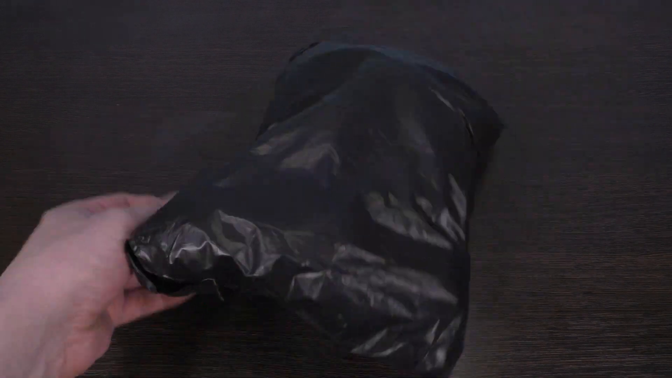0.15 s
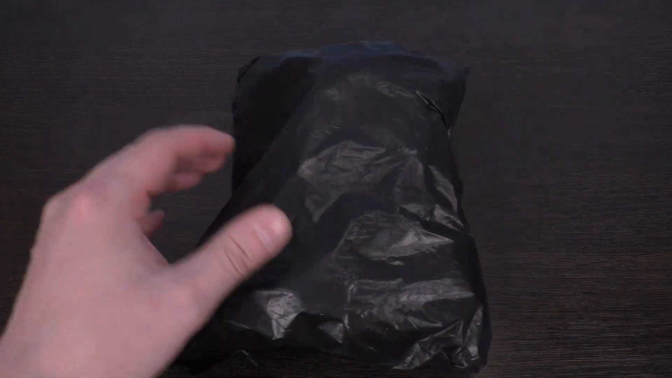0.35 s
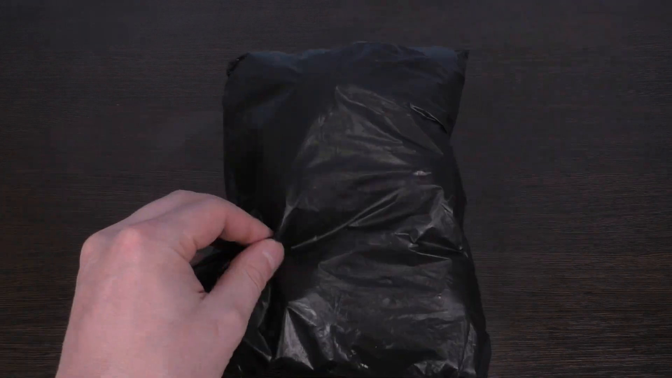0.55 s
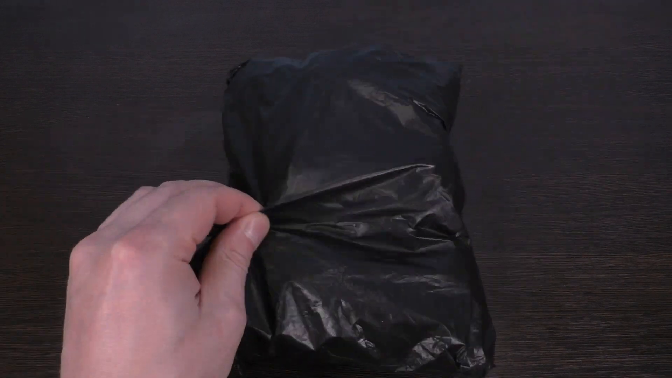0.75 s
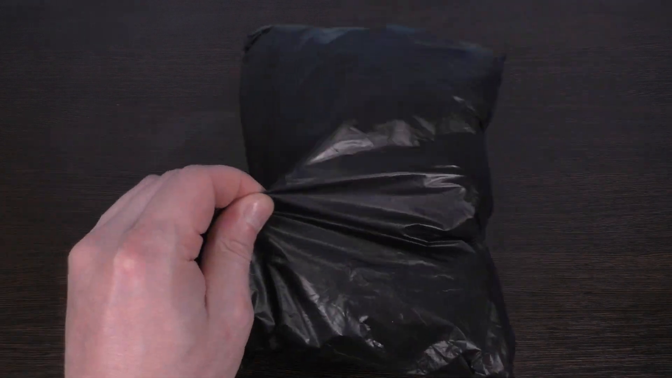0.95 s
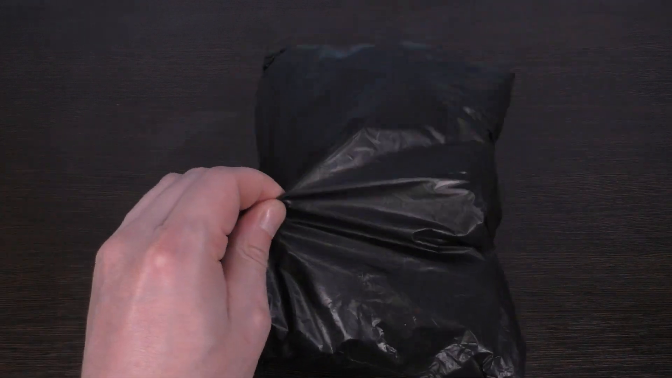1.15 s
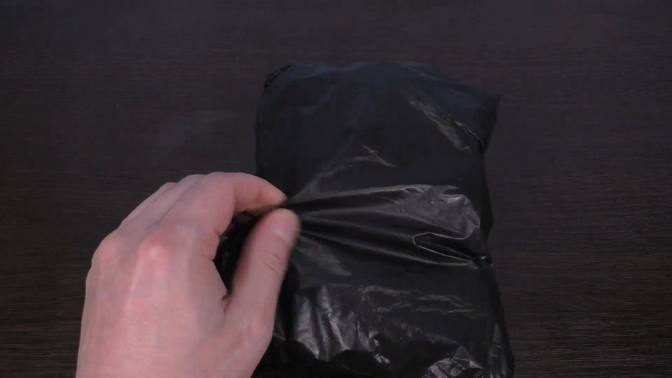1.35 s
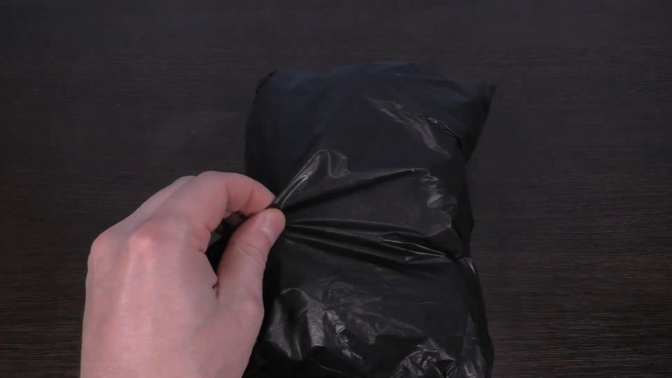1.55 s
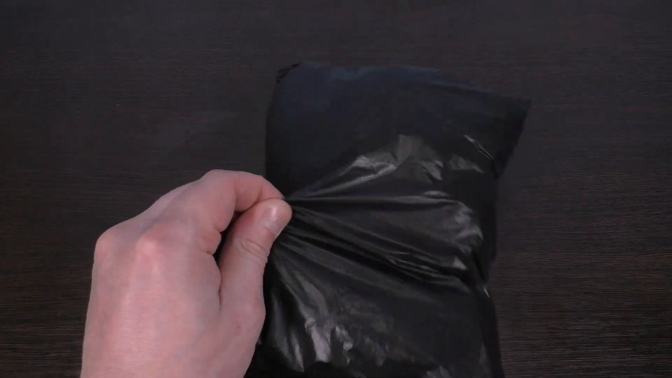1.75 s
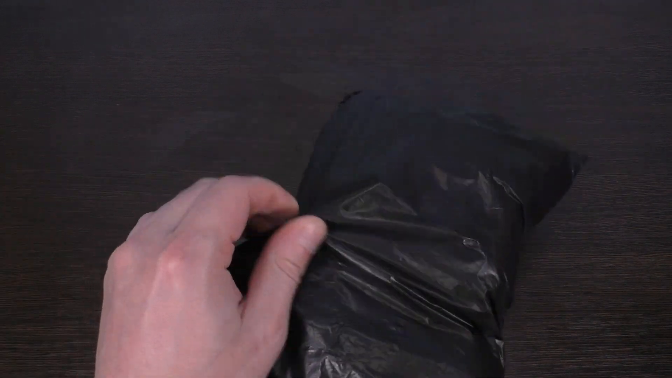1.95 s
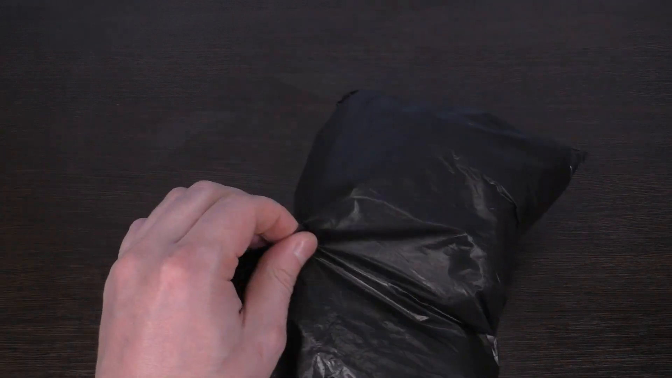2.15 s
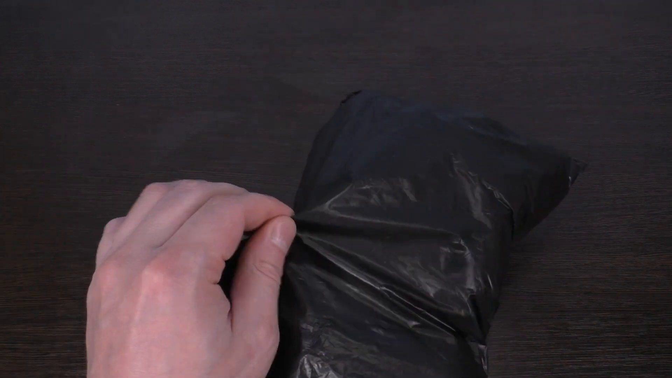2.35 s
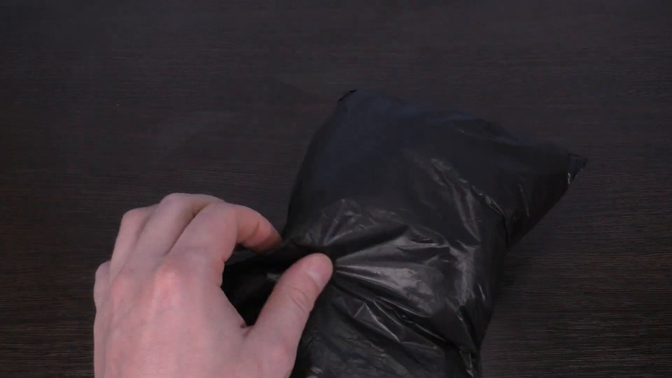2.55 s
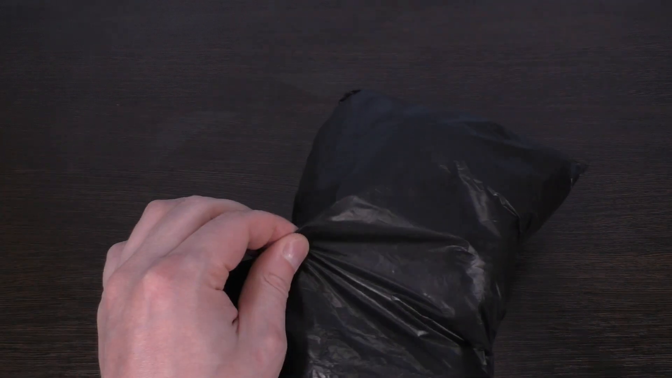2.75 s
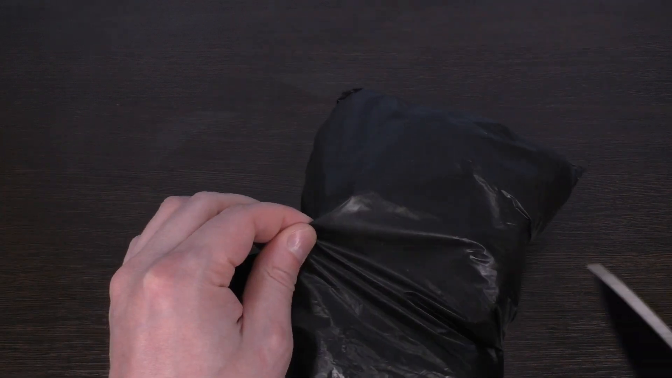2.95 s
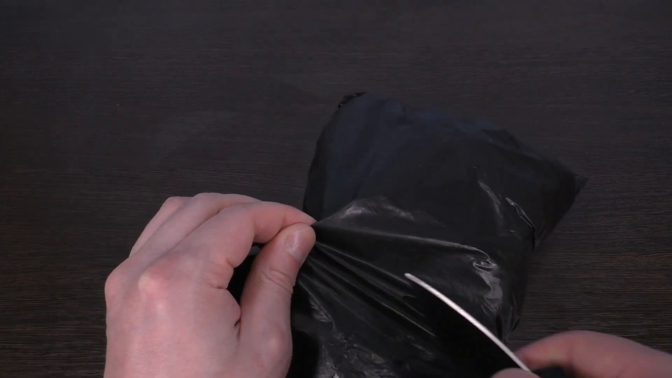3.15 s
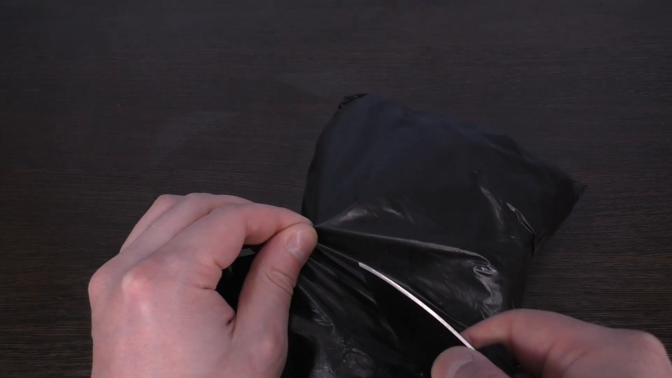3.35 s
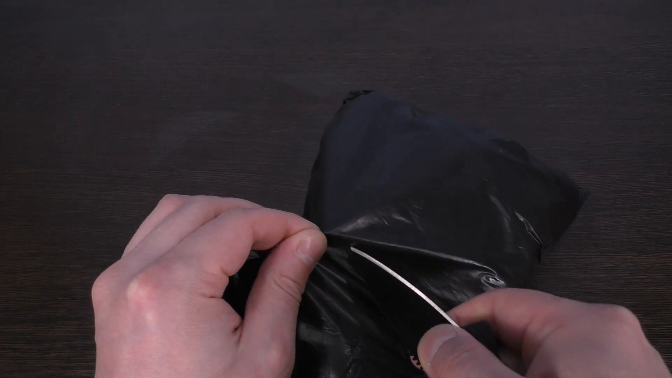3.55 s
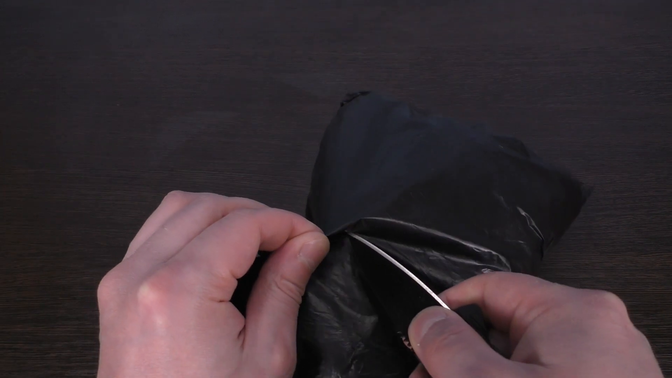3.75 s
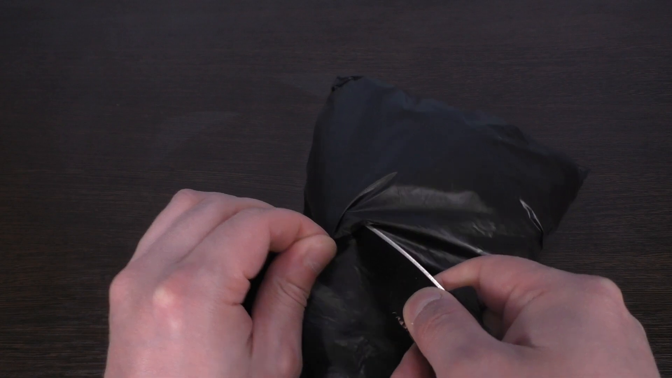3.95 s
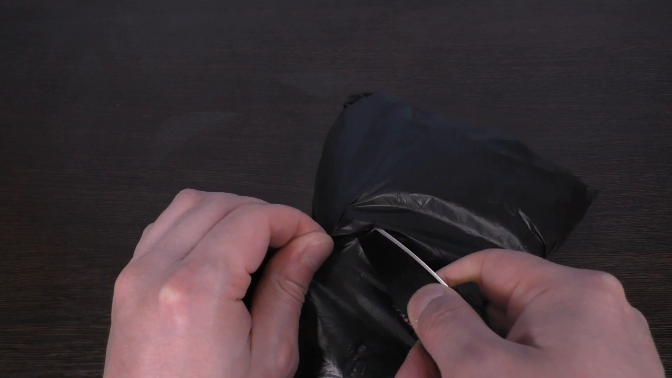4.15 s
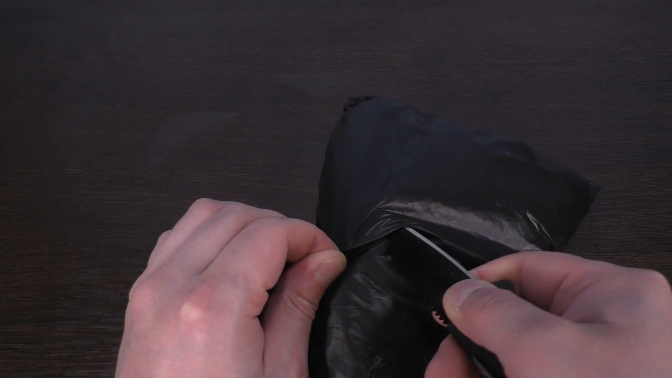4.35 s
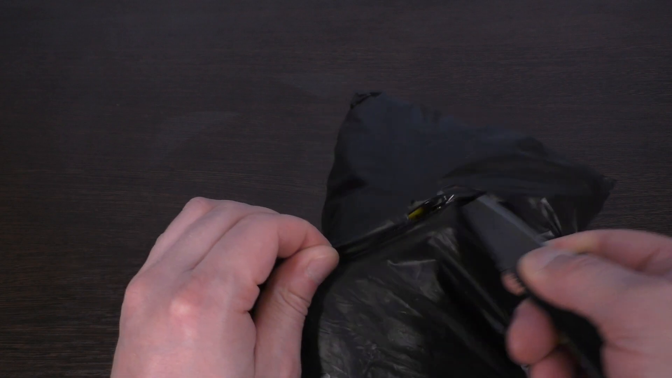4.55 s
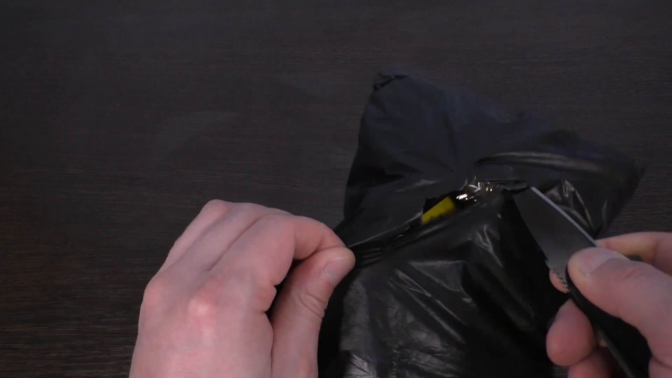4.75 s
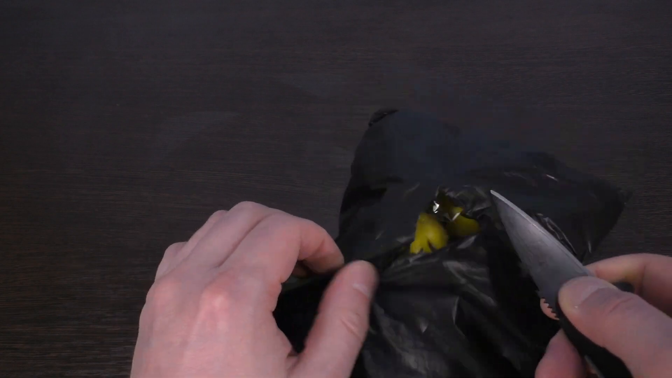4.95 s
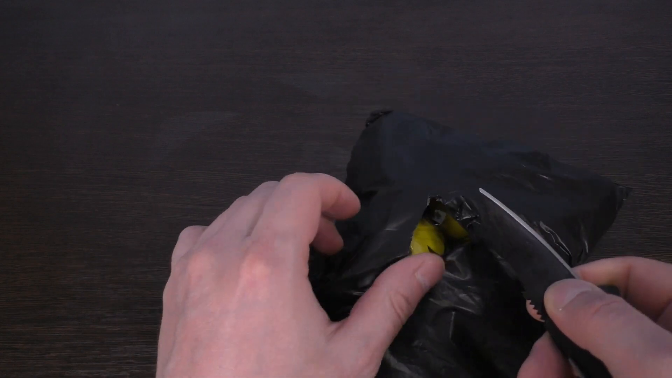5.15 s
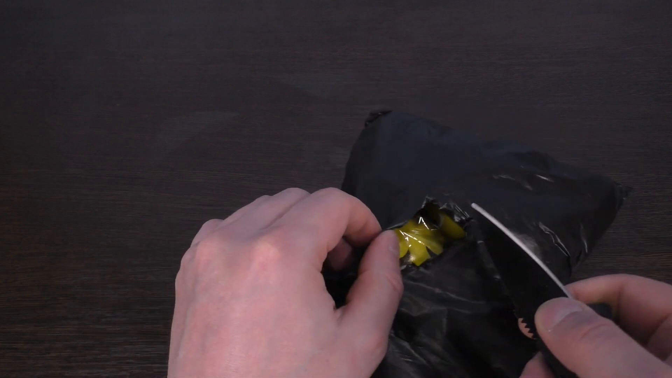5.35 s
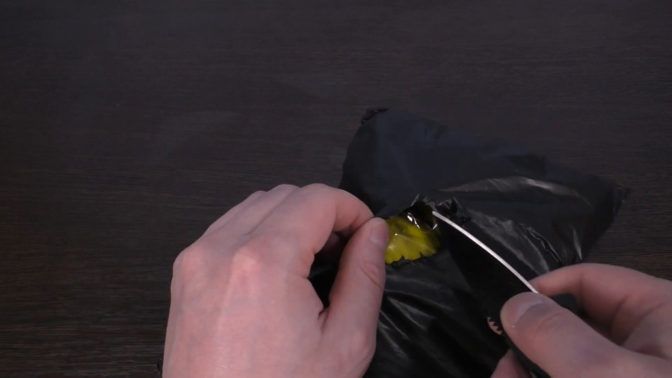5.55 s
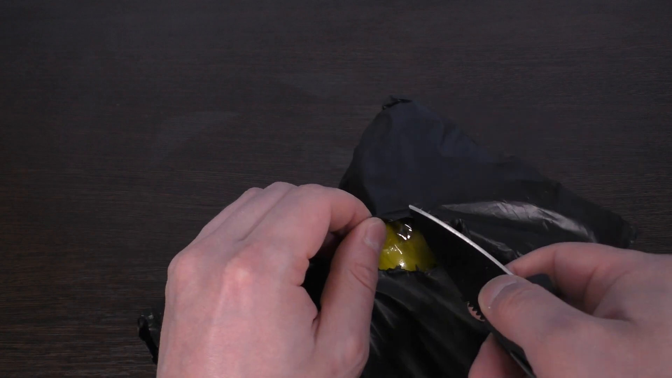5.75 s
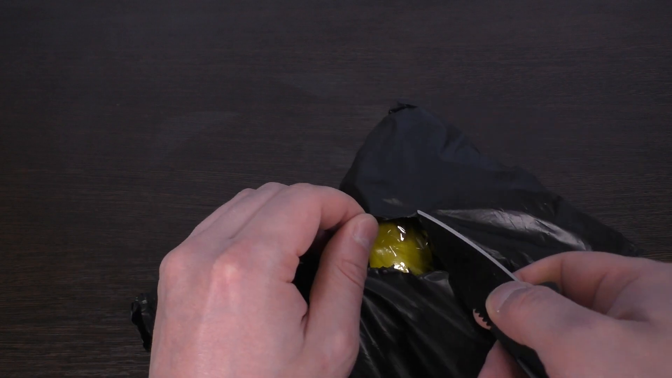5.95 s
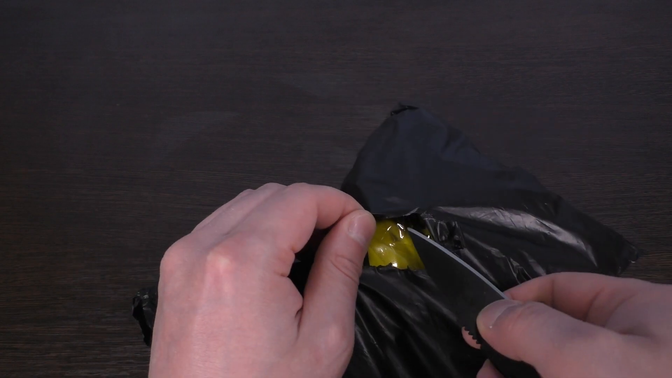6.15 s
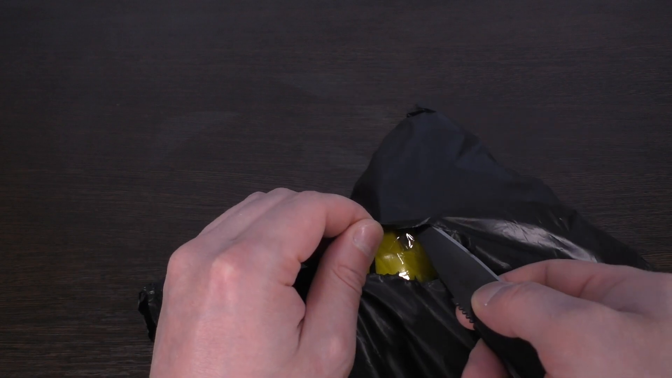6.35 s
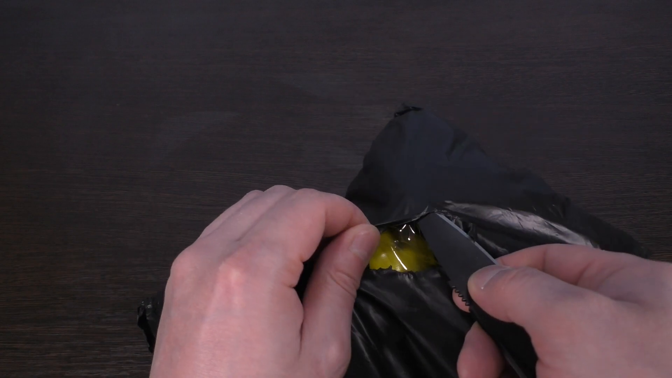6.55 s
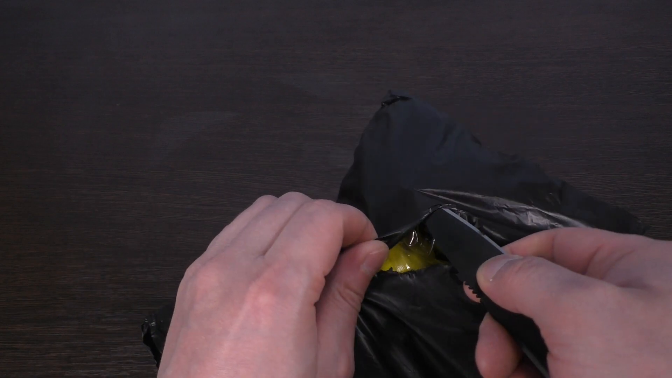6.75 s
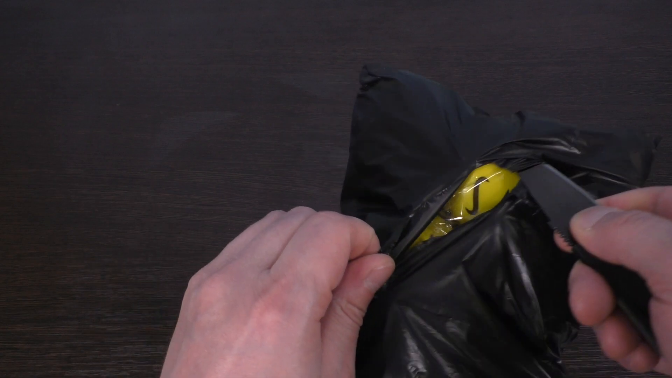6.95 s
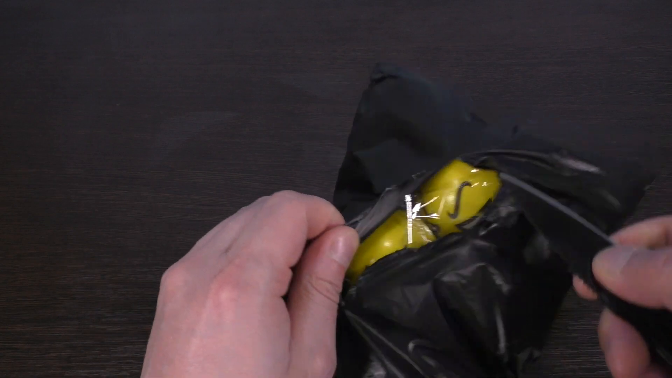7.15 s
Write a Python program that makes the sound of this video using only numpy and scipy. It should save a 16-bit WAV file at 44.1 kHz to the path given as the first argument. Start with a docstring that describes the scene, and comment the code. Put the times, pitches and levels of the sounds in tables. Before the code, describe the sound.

A soft parcel in thin plastic film lands on a wooden table with a rustle and dull thump. Fingers pinch and pull it in uneven bursts of bright crinkling. After a near-silent lull, a blade stretches and slits the film with loud, taut snaps, then lighter crackles, another hush and a final tearing rustle. Close microphone, small quiet room.

```python
"""A short rustle and a soft thump: a thin plastic mailer bag is dropped on a wooden table, close up.
It is then pinched taut and slit with a knife, heard as crinkle: random tiny pops, denser with effort.
Single creases snap, loud or faint, each a crack plus a briefly swinging panel; quick runs of pops join in.
The skin adds a low flutter and the parcel soft thumps, made of short decaying notes and pushes.
The table answers with an echo and a hum, the small room with a diffuse tail over a faint noise bed."""
import sys
import numpy as np
from scipy import signal
from scipy.fft import rfft, irfft, next_fast_len
from scipy.io import wavfile
from scipy.ndimage import uniform_filter1d, map_coordinates

SR = 44100
rng = np.random.default_rng(int(sys.argv[2]) if len(sys.argv) > 2 else 0)


def wrap_up_sound(samples):
    """Save the sound to the file named by the first command line argument, as 16-bit audio."""
    columns = np.atleast_2d(samples).T
    # keep every value between -1 and 1, then stretch to whole-number steps
    tamed = np.clip(columns, -1, 1)
    steps = np.round(tamed * 32767).astype(np.int16)
    wavfile.write(sys.argv[1], SR, steps)


N = 321930

# All levels are relative, ahead of the mix gains; coloured() reads spectra for their shape only.
# single creases that stand out, loud or faint, flip over or give way to the blade:
# t/s, panel level/dB, panel f/Hz, crack level/dB
CREASE_SNAPS = [(0.2648, -22, 3210.0, -31), (0.484, -22.5, 3350.0, -22.0), (0.5007, -26, 3440.0, -26),
                (0.551, -19.5, 2680.0, -16), (0.5814, -22.0, 2480.0, -22), (0.6091, -21.5, 2450.0, -20.0),
                (0.7784, -22.5, 2760.0, -18), (0.8532, -20.0, 2370, -18.5), (0.8822, -19.5, 3340.0, -15.5),
                (0.9583, -20.5, 2542, -27), (1.1285, -27, 2700.0, -26.5), (1.2016, -25.5, 2970.0, -30),
                (1.2718, -21, 2160.0, -27), (1.6646, -24.5, 3990.0, -25.0), (1.7336, -25, 2810.0, -21.0),
                (1.88, -27, 2510.0, -28), (1.9109, -33.0, 2590.0, -25.5), (1.9837, -19, 2800.0, -23.5),
                (2.0315, -23, 2450.0, -23.5), (2.0912, -26.5, 2630.0, -27.5), (2.4496, -27, 3780.0, -30.5),
                (2.5693, -21.5, 3120.0, -26.0), (2.6169, -22, 2668, -21), (2.6303, -27, 3280.0, -32),
                (2.708, -26, 1900.0, -26), (2.8899, -28, 3030, -21.5), (3.0141, -26.5, 3180, -22.5),
                (3.0573, -32, 2970.0, -32), (3.0969, -30.5, 3370.0, -31.5), (3.1199, -27, 3490.0, -36.0),
                (3.1673, -34.0, 3090.0, -37), (3.2241, -30.5, 3370.0, -36.0), (3.2929, -35, 2338, -46),
                (3.3464, -30.5, 1970.0, -29.0), (3.3812, -34.5, 1630.0, -39), (3.4349, -27.5, 3000.0, -32),
                (3.4846, -42.0, 2460.0, -35.0), (3.4933, -29, 3000, -41), (3.6209, -39.0, 2760.0, -45),
                (3.631, -27, 2010.0, -54), (3.6416, -30, 3530.0, -28.0), (3.6849, -18.5, 2570.0, -19),
                (3.7332, -22.0, 2646, -23), (3.8268, -20.5, 2700, -26), (3.8646, -25, 1980.0, -26.0),
                (3.8927, -25, 2990.0, -21), (3.9153, -23.5, 2410.0, -27.5), (3.9952, -13, 2230, -12.0),
                (4.0331, -16, 2750, -24.0), (4.0613, -24, 3110.0, -12.5), (4.1983, -21.5, 2070, -24.5),
                (4.288, -26.5, 1610.0, -38), (4.3095, -34, 2020.0, -33), (4.3329, -13.5, 2420, -19),
                (4.4248, -33, 2290.0, -20), (4.5438, -15.5, 2160, -13.5), (4.5988, -12.0, 2130.0, -17),
                (4.8106, -34, 3370.0, -28), (4.865, -25, 2550.0, -35), (4.9981, -22, 2620.0, -22),
                (5.1651, -25.5, 2950, -33.5), (5.2339, -29.5, 2720, -34), (5.3486, -29, 3710.0, -19),
                (5.4024, -22.5, 2200.0, -24.5), (5.4606, -32, 2750.0, -24), (5.5109, -33, 2530.0, -30),
                (5.5863, -26.0, 3220.0, -21), (5.6507, -29.5, 1790.0, -26), (5.6941, -39, 2740.0, -29.5),
                (5.7648, -31, 2470.0, -29), (5.8282, -26.5, 2200, -33), (5.8656, -34, 3060.0, -31.5),
                (5.9095, -31.5, 2424, -46), (5.9588, -37, 2010.0, -37.5), (6.1874, -36, 2320.0, -42.0),
                (6.2091, -37, 3090.0, -49), (6.3071, -37.0, 2760.0, -45.0), (6.5638, -30, 2700.0, -36),
                (6.6227, -27.5, 3050.0, -31.5), (6.7149, -25.5, 2830, -29.5), (6.8225, -31.5, 1600.0, -29),
                (7.0426, -24, 3770.0, -26)]
# the parcel lands, is nudged and tugged: t/s, level/dB, f/Hz
PARCEL_THUMPS = [(0.094, -20.5, 183), (0.35, -31, 125), (0.477, -34, 210), (1.521, -30, 170.1),
                 (1.788, -31, 160.9), (1.97, -26, 165), (2.03, -31, 170), (2.14, -29.5, 166.9),
                 (2.616, -31, 245), (2.712, -30.5, 283), (2.891, -24, 286), (3.013, -35, 254),
                 (3.685, -26.5, 287), (3.996, -18, 290), (4.059, -26, 205), (4.195, -25, 250),
                 (4.377, -29, 203), (4.556, -31, 165), (6.182, -41, 238), (6.713, -39, 206),
                 (6.943, -35, 270), (7.024, -22, 233)]
# spectrum of the film's panels: f/Hz, level/dB
PANEL_COLOUR = [(400, -41.5), (650, -3), (850, -12), (1050, -2.5), (1280, -5.5), (1450, -3.5), (1900, -2),
                (3100, 0), (4200, -3.5), (5500, -9), (7000, -13), (10000, -43.5)]
# spectrum of its sharp creases: f/Hz, level/dB
CREASE_COLOUR = [(3000, -31), (5000, -5), (7000, -5.5), (8700, 0.5), (10600, 1), (13600, -3),
                 (16000, -13.5)]
# spectrum of the whole skin: f/Hz, level/dB
SKIN_COLOUR = [(30, -43), (60, -17.5), (100, -12.5), (125, -2), (150, -10), (185, -2), (300, -2),
               (450, -5.5), (600, -15), (900, -17.5)]
# spectrum of the quiet room: f/Hz, level/dB
QUIET_COLOUR = [(20, -29), (36, -12), (49, 11), (62, -6), (125, 3.5), (300, -3.5), (700, -7.5), (3000, -12),
                (16000, -25)]
# decay of the room tail: f/Hz, t60/s
ROOM_DECAY = [(120, 0.53), (400, 0.41), (2500, 0.42), (8000, 0.32), (16000, 0.49)]
# how tightly the blade stretches the film: t/s, tension/0-1
FILM_TENSION = [(3.5, 0.4), (3.98, 0.8), (4.55, 1), (4.75, 0.5), (5.1, 0.36), (6.0, 0.4), (7.0, 0.5)]
# a stretched panel sings higher and loses its slack low notes: f/Hz, level/dB
TAUT_COLOUR = [(400, -5.5), (650, -3.5), (850, -9), (1080, -2), (1450, 4.5), (1750, -2), (2200, -1.5),
               (4000, 0.5)]
# colour of the left-right difference: f/Hz, level/dB
WIDTH_COLOUR = [(100, 3), (300, 1.5), (700, -0.5), (1200, -1.5), (4800, 2), (6400, -4.5), (7700, -26),
                (9500, -0.5), (12500, 1.5), (16000, 7)]
# low resonances of table and room: f/Hz, t60/s, level when the parcel lands/dB
LOW_RESONANCES = [(126, 0.65, -37), (184, 0.45, -26)]
# one crease sets off its neighbours in a quick run: t/s, start level/dB, t60/s
CREASE_RUNS = [(0.481, -27, .08), (1.2701, -30, 0.06), (2.5975, -26, .045), (3.164, -38, 0.044),
               (3.346, -32.5, 0.04), (3.434, -33.5, 0.041), (3.483, -44, 0.03), (3.492, -36, 0.035),
               (3.998, -19, 0.041), (4.376, -20.5, 0.087), (4.543, -19, 0.074), (5.163, -47, 0.023),
               (5.233, -36, 0.021), (5.4522, -29, .03), (6.179, -46, 0.061), (6.8901, -29, 0.045)]
# what the room gives back: f/Hz, level/dB
WALL_COLOUR = [(100, 0), (600, 0), (1300, 6), (2500, 3.5), (5000, -0.5), (10000, -10), (16000, -3.5)]
# slow rubbing leaves the panels duller: f/Hz, level/dB
GENTLE_COLOUR = [(500, -8), (800, 3.5), (1200, 2.5), (3200, -2), (4300, -5), (7000, -16)]
# each push, pinch or pull: start t/s, length/s, crinkle level/dB, swell or fade over its length/dB,
# treble against crinkle/dB
HAND_MOVES = [(0.0, 0.048, -29.0, -3.0, 0.0), (0.103, 0.008, -20.0, 0.0, 0),
              (0.13, 0.177, -36.0, 1.0, -1.5), (0.347, 0.061, -31.5, -7.0, -2.5),
              (0.497, 0.145, -28.5, -1.0, -0.5), (0.714, 0.127, -33.0, -3.0, 0.0),
              (0.854, 0.121, -29.5, -4.0, -0.5), (0.969, 0.096, -38.5, 7.0, -2),
              (1.099, 0.023, -39.0, 2.0, -0.5), (1.202, 0.008, -31.0, -1.0, 1.5),
              (1.277, 0.014, -31.0, 0.0, -1.5), (1.383, 0.068, -36.5, 4.0, 0),
              (1.514, 0.055, -29.0, -2.0, -1), (1.655, 0.091, -35.0, -4.0, -1),
              (1.76, 0.087, -31.5, 1.0, 0.5), (1.98, 0.053, -30.5, -1.0, -1), (2.14, 0.049, -33.5, 1.0, 0),
              (2.233, 0.083, -38.0, -3.0, -2.5), (2.376, 0.08, -44.5, 5.0, -1),
              (2.603, 0.028, -30.5, 2.0, 0), (2.69, 0.024, -35.0, 2.0, -2),
              (2.779, 0.009, -37.5, -3.0, 4.5), (2.881, 0.012, -33.0, 0.0, -1),
              (3.011, 0.103, -47.5, -1.0, 0.5), (3.655, 0.101, -35.5, -4.0, -4),
              (3.831, 0.049, -35.5, 3.0, -4), (4.005, 0.063, -29.5, 1.0, -2.0),
              (4.175, 0.034, -40.5, 6.0, -1.5), (4.249, 0.016, -36.0, -4.0, -1.5),
              (4.386, 0.078, -31.0, -9.0, 0.5), (4.56, 0.123, -25.0, 0.0, -0.5),
              (4.695, 0.058, -40.0, 2.0, 1), (4.829, 0.066, -43.5, 4.0, -0.5),
              (4.965, 0.075, -34.5, 7.0, -0.5), (5.064, 0.057, -39.5, -1.0, 0.5),
              (5.29, 0.145, -36.0, -3.0, -1), (5.453, 0.061, -44.0, 3.0, -4),
              (5.567, 0.091, -40.0, -3.0, -3.5), (5.759, 0.124, -47.0, -13.0, 0.5),
              (6.056, 0.045, -54.5, 5.0, -6.5), (6.457, 0.049, -44.5, -4.0, -2.0),
              (6.568, 0.05, -40.5, -2.0, -1.5), (6.663, 0.069, -45.0, 5.0, -2.5),
              (6.809, 0.0643, -41.0, -5.0, -4), (6.894, 0.157, -25.5, -1.0, 0.0),
              (7.04, 0.101, -36.0, 0.0, 2.5), (7.172, 0.109, -36.5, 6.0, 1.0)]
# the holding hand keeps the film stirring between moves: t/s, crinkle level/dB
HOLDING_GRIP = [(0.0, -40.0), (0.46, -46.0), (0.7, -38.0), (1.16, -45.0), (1.62, -40.0), (2.08, -46.0),
                (2.54, -50.0), (2.7, -40.0), (3.1, -47.0), (3.2, -62.0), (3.6, -62.0), (3.7, -42.0),
                (4.8, -44.0), (5.22, -48.0), (5.6, -41.0), (6.0, -54.0), (6.4, -51.0), (7.3, -46.0)]

TOP_HZ = 16100  # band limit
GRAB_DB_PER_S, RELAX_DB_PER_S = 630, 450  # build-up to a move's start, settling after its end
FULL_TREBLE_DB, DULLING = -34.5, 0.46  # a grip below this level loses so many dB of treble per dB
# further snaps: rate at average effort, growth of its logarithm per dB of effort
TICKS_PER_S, TICKS_GROW = 15, .03
# their panel and crack at average effort, dB gained per dB of effort, random scatter
TICK_DB, TICK_CRACK_DB, TICK_FOLLOWS, TICK_SCATTER_DB = -32, -32, .75, 3
TICK_HZ, TICK_OCTAVES = 2720, 0.43  # pitch of their panels and its scatter
THUMP_T60_S = 0.049
# flutter at average effort, dB gained per dB of effort, extra when fully taut
FLUTTER_DB, FLUTTER_FOLLOWS, TAUT_FLUTTER_DB = -47, 0.91, 2.5


def crinkle(level, treble, rate=2300, rate_per_db=0.05, spread_db=6.6, spread_per_db=-0.0958,
            own_db=3, dull_db=-10, gentle_db=-4, rub_share=.65):
    """Wrinkles buckle at random, driving panel, crease and skin; dull, gentle handling adds steady rubbing."""
    effort = level - np.mean(level)
    at = np.flatnonzero(rng.random(N) < rate * np.exp(rate_per_db * effort) / SR)
    shared, mid, high = rng.standard_normal((len(at), 3)).T
    # harder handling evens out the pop sizes
    size_db = (spread_db + spread_per_db * effort[at]) * shared
    panels = pops(at / SR, amp(size_db + own_db * mid), life_s=.0003, even_s=0.022)
    creases = pops(at / SR, amp(size_db + own_db * high), life_s=0.00012, even_s=0.032)
    skin = pops(at / SR, amp(4.7 * shared), life_s=0.0004, even_s=0.018)

    # softness reaches 1 when the treble falls to dull_db
    softness = np.clip(treble / dull_db, 0, 1)
    rub = np.clip(rub_share * softness ** 2, 0, 1)
    creases = np.sqrt(1 - rub) * creases + np.sqrt(rub) * rng.standard_normal(N)
    gentle_panels = amp(gentle_db) * coloured(panels, GENTLE_COLOUR)
    panels = (1 - softness) * panels + softness * gentle_panels

    body = amp(level) * coloured(panels, PANEL_COLOUR)
    edge = amp(level + treble) * coloured(creases, CREASE_COLOUR)
    flutter_db = FLUTTER_DB + FLUTTER_FOLLOWS * effort + TAUT_FLUTTER_DB * tension()
    return body + edge, amp(flutter_db) * coloured(skin, SKIN_COLOUR)


def handling(unsteady_db=1.0, unsteady_rate=45):
    """Crinkle level and treble share in dB: each move builds, is held and settles over the grip."""
    t = seconds(N)[::32]  # coarse control steps
    start, length, db, swell_db, treble_db = np.transpose(HAND_MOVES)[:, :, None]
    held = db + swell_db * np.clip((t - start) / length, 0, 1)
    build = GRAB_DB_PER_S * np.maximum(start - t, 0)
    settle = RELAX_DB_PER_S * np.maximum(t - start - length, 0)
    moves = held - build - settle
    grip = np.interp(t, *np.transpose(HOLDING_GRIP))
    bright_grip = grip + DULLING * np.minimum(grip - FULL_TREBLE_DB, 0)
    level = power_sum(t, np.vstack([moves, grip]))
    high = power_sum(t, np.vstack([moves + treble_db, bright_grip]))
    return level + unsteady_db * wobble(unsteady_rate), high - level


def tension():
    """How taut the film is, 0-1, at every sample."""
    return np.clip(np.interp(seconds(N), *np.transpose(FILM_TENSION)), 0, 1)


def stretched(x):
    """Tension crossfades the film's colour from slack to taut."""
    taut = tension()
    return (1 - taut) * x + taut * coloured(x, TAUT_COLOUR)


def snaps(rows, cycles=0.85, ring_db=17, rattle_db=12, crack_db=19.5, push_db=4.0):
    """A crease cracks, the panel beside it swings for a cycle or two, and the skin gets a push."""
    s, db, hz, sharp_db = np.transpose(rows)
    turns = hz[:, None] * seconds(192)
    swing = unit_energy(np.sin(2 * np.pi * turns) * turns * np.exp(-2 * turns / cycles))
    size = amp(db)[:, None]
    sharp = amp(sharp_db)[:, None]
    # the panel flips either way, so the swing takes a random sign
    ring = placed(s, size * swing * rng.choice([-1, 1], (len(s), 1)))
    rattle = coloured(placed(s, size * bursts(len(s), life_s=0.0013)), PANEL_COLOUR)
    crack = coloured(placed(s, sharp * bursts(len(s), life_s=0.00072)), CREASE_COLOUR)
    push = coloured(placed(s, size), SKIN_COLOUR)
    return amp(ring_db) * ring + amp(rattle_db) * rattle + amp(crack_db) * crack, amp(push_db) * push


def further_snaps(level, treble):
    """Rows like CREASE_SNAPS for further snaps at random times, more frequent and louder with effort."""
    effort = level - np.mean(level)
    at = np.flatnonzero(rng.random(N) < TICKS_PER_S * np.exp(TICKS_GROW * effort) / SR)
    panel, pitch, crack = rng.standard_normal((len(at), 3)).T
    push = TICK_FOLLOWS * effort[at]
    panel_db = TICK_DB + push + TICK_SCATTER_DB * panel
    hz = TICK_HZ * 2 ** (TICK_OCTAVES * pitch)
    crack_db = TICK_CRACK_DB + push + treble[at] + TICK_SCATTER_DB * crack
    return np.column_stack([at / SR, panel_db, hz, crack_db])


def runs(rate=3500, crease_db=-1):
    """Neighbouring creases give way in a dense volley of pops that starts at once and dies out."""
    s, db, t60 = np.transpose(CREASE_RUNS)
    level = placed(s, amp(db[:, None] - 60 * seconds(SR // 6) / t60[:, None]))
    times = np.flatnonzero(rng.random(N) < rate / SR) / SR
    volley = pops(times, amp(0.98 * rng.standard_normal(len(times))), life_s=0.00051, even_s=0.0046)
    return level * (coloured(volley, PANEL_COLOUR) + amp(crease_db) * coloured(volley, CREASE_COLOUR))


def film_ring(x, t60, count=700):
    """Each pop runs on through the neighbouring folds as a brief decaying noise tail."""
    t = seconds(SR // 25)
    fade = amp(-60 * t / t60) * (1 - np.exp(-t / 0.0016))
    return shifting(x, unit_energy(rng.standard_normal((count, len(t))) * fade))


def thumps(rise_s=0.0015, gain_db=-1, push_db=-13, push_s=0.00079, push_db_per_octave=-11, table_hz=183):
    """The soft parcel gives a short dull note and a push: heavy when low, lighter when its skin jerks taut."""
    s, db, hz = np.transpose(PARCEL_THUMPS)
    t = seconds(SR // 4)
    fade = amp(-60 * t / THUMP_T60_S) * (1 - np.exp(-t / rise_s))
    note = fade * np.sin(2 * np.pi * hz[:, None] * t)
    u = t / push_s
    weight = amp(push_db + push_db_per_octave * np.log2(hz / table_hz))[:, None]
    push = weight * 2 * u * (2 - u) * np.exp(-u)
    return placed(s, amp(db + gain_db)[:, None] * (note + push))


def landing_boom():
    """The first drop leaves the low resonances ringing as decaying sines."""
    t = seconds(SR)
    ring = sum(amp(db - 60 * t / t60) * np.sin(2 * np.pi * hz * t) for hz, t60, db in LOW_RESONANCES)
    return placed(np.array([PARCEL_THUMPS[0][0]]), (ring * (1 - np.exp(-t / 0.013)))[None])


def table_echo(x, delay_s=.0021, count=700):
    """The table top returns each pop about two milliseconds later, varied as the sounding fold shifts."""
    lag = np.clip(delay_s * np.exp(.18 * rng.standard_normal(count)) * SR, 1, 255).astype(int)
    return shifting(x, np.eye(256)[lag])  # one-sample echoes


def table_hum(x):
    """Low sounds of the handling keep stirring the same low resonances."""
    t = seconds(SR // 2)
    ring = sum(amp(-60 * t / t60) * np.cos(2 * np.pi * hz * t) / t60 for hz, t60, db in LOW_RESONANCES)
    return signal.fftconvolve(x, ring * 2 * np.log(1000) / SR)[:N]


def room(x, count=14):
    """Diffuse noise tails whose decay and strength depend on frequency."""
    hz, t, z = signal.stft(rng.standard_normal((count, SR // 2)), SR, nperseg=256)
    fade_db = along(WALL_COLOUR, hz)[:, None] - 60 * t / along(ROOM_DECAY, hz)[:, None]
    fade = amp(fade_db) * (1 - np.exp(-t / 0.0044))
    return shifting(x, unit_energy(signal.istft(z * fade, SR, nperseg=256)[1]))


def quiet_room():
    """Two independent beds of steady coloured noise, for middle and side."""
    return np.array([coloured(rng.standard_normal(N), QUIET_COLOUR) for _ in range(2)])


def amp(db):
    """Decibels to gain."""
    return 10 ** (np.asarray(db) / 20)


def unit_energy(x):
    """Each row scaled to energy 1."""
    return x / (np.linalg.norm(x, axis=-1, keepdims=True) + 1e-12)


def along(points, hz):
    """(f/Hz, value) points read on a log frequency axis."""
    f, v = np.transpose(points)
    return np.interp(np.log(hz + 1), np.log(f + 1), v)


def seconds(size):
    """Time axis of so many samples."""
    return np.arange(size) / SR


def power_sum(t, rows_db):
    """Levels summed as powers, in dB at every sample."""
    return np.interp(seconds(N), t, 10 * np.log10(np.sum(amp(rows_db) ** 2, axis=0)))


def wobble(rate):
    """A smooth random curve, rate knots a second."""
    return map_coordinates(rng.standard_normal(int(N * rate / SR) + 4), [np.arange(N) * rate / SR])


def placed(starts, rows):
    """Short sounds summed at their start times."""
    at = np.maximum(np.round(starts * SR).astype(int), 0)[:, None] + np.arange(rows.shape[1])
    return np.bincount(at.ravel(), rows.ravel(), N)[:N]


def coloured(x, spectrum, size=4096):
    """x through a causal minimum-phase filter of energy 1 with this spectral shape."""
    cepstrum = irfft(np.log(amp(along(spectrum, np.fft.rfftfreq(size, 1 / SR)))))
    # folding the cepstrum forward makes the response causal
    fold = 1 + np.sign(size // 2 - np.arange(size))
    fold[0] = 1
    response = unit_energy(irfft(np.exp(rfft(cepstrum * fold))))
    return signal.oaconvolve(x, response)[:N]


def bursts(count, life_s, size=160):
    """Tiny ragged pressure bursts of decaying noise, each with a colour of its own."""
    u = seconds(size) / life_s
    return unit_energy(rng.standard_normal((count, size)) * (1 + 2 * u) * np.exp(-2 * u))


def pops(times, sizes, life_s, even_s):
    """A stream of bursts whose power, smoothed twice over even_s, stays near 1."""
    stream = placed(times, sizes[:, None] * bursts(len(times), life_s))
    width = max(int(even_s * SR), 2)
    power = uniform_filter1d(uniform_filter1d(stream ** 2, width), width)
    return stream / np.sqrt(np.abs(power) + np.mean(stream ** 2) * 1e-4)


def shifting(x, responses):
    """Successive stretches of x pass through successive responses, as the bag moves."""
    count = len(responses)
    hop = N // count + 1
    blocks = np.pad(x, (0, count * hop - N)).reshape(count, hop)
    return placed(np.arange(count) * hop / SR, signal.fftconvolve(blocks, responses, axes=1))


def scene():
    """The bag lies near the centre, leaning slightly right; folds and room give it a little width."""
    level, treble = handling()
    film, flutter = crinkle(level, treble)
    cracks, pushes = snaps(np.vstack([CREASE_SNAPS, further_snaps(level, treble)]))
    pop = stretched(film + cracks + runs())
    high = amp(-1.5) * (pop + amp(-10) * table_echo(pop) + amp(-7.5) * film_ring(pop, t60=0.023))
    low = flutter + pushes + thumps()

    mid = high + low + landing_boom() + amp(-9.5) * table_hum(low)
    mid = mid + amp(-18.0) * room(high) + amp(-10.5) * room(low)
    side = amp(-12.5) * film_ring(high, t60=0.0087)
    side = side + amp(-22.0) * room(high) + amp(-16.0) * room(low)
    quiet = quiet_room()
    mid = mid + amp(-60.0) * quiet[0]
    side = amp(1.5) * coloured(side, WIDTH_COLOUR) + amp(-65.0) * quiet[1]

    # the lean to the right grows; the low sounds are set a little to the left
    right_db = np.interp(seconds(N), [2.5, 4], [.13, .52])
    stereo = np.array([mid + side, mid - side]) * amp([-right_db, right_db])
    return stereo + amp(-20.0) * np.array([low, -low])


def record(dry):
    """The loudest peaks are rounded off below 0.75, then a steep low-pass sets the band limit."""
    rounded = dry / (1 + (dry / .75) ** 4) ** (1 / 4)
    size = next_fast_len(N + SR // 4)
    hz = np.fft.rfftfreq(size, 1 / SR)
    return irfft(rfft(rounded, size) / np.sqrt(1 + (hz / TOP_HZ) ** 200), size)[:, :N]


dry = scene()
out = record(dry)
wrap_up_sound(out)
```